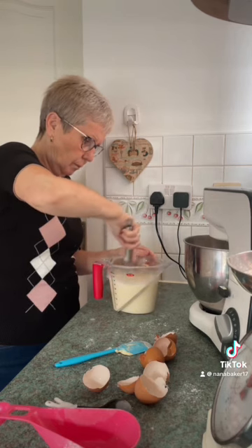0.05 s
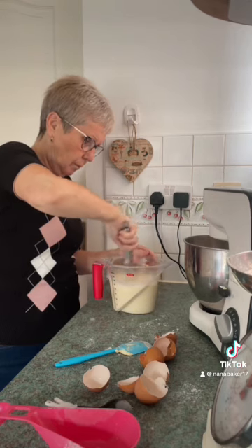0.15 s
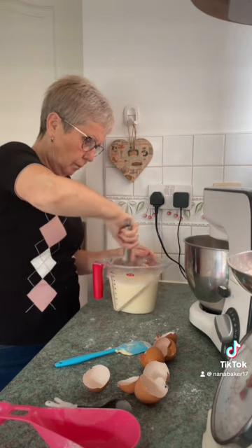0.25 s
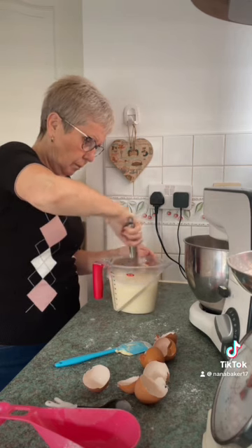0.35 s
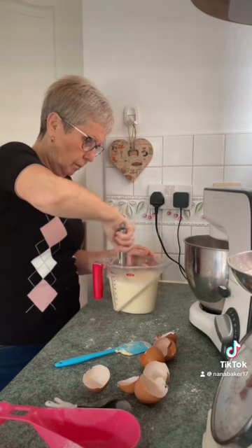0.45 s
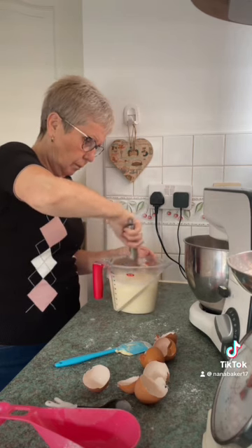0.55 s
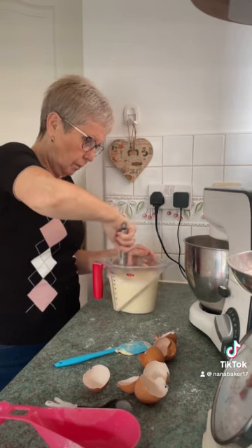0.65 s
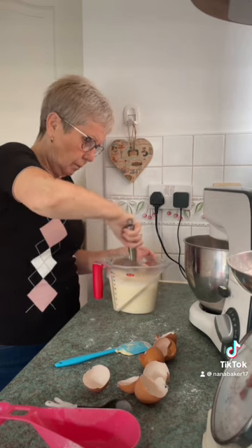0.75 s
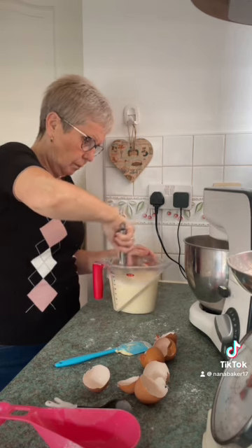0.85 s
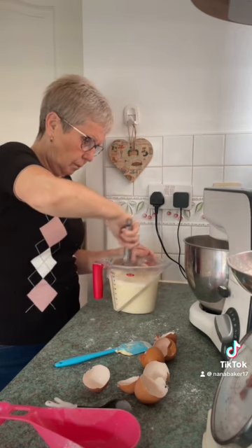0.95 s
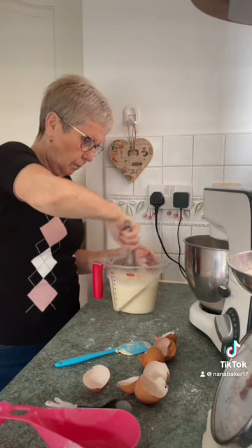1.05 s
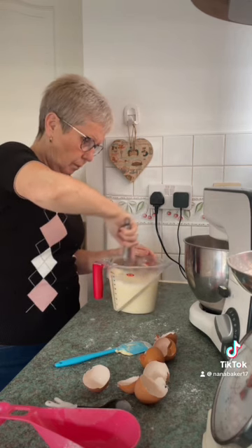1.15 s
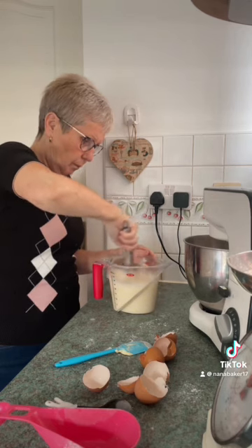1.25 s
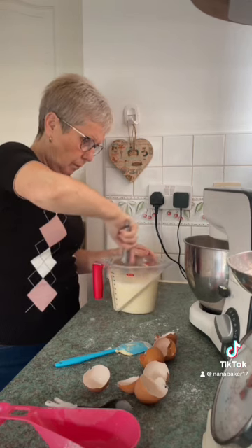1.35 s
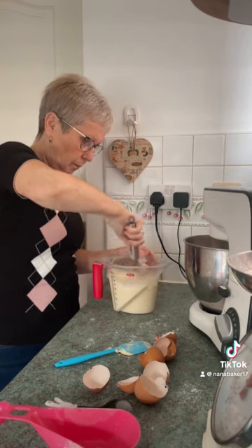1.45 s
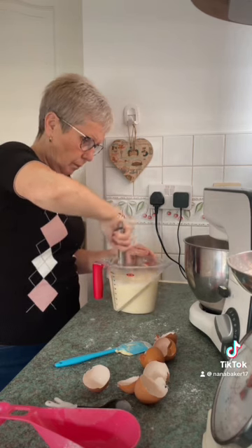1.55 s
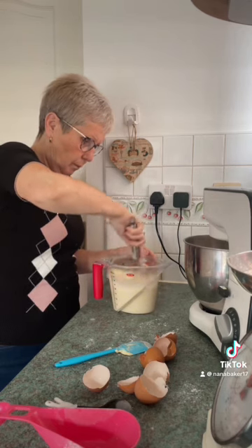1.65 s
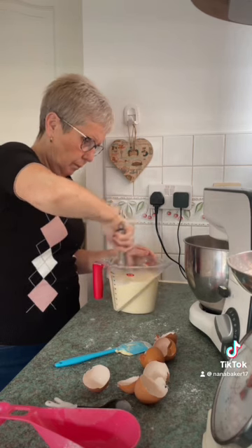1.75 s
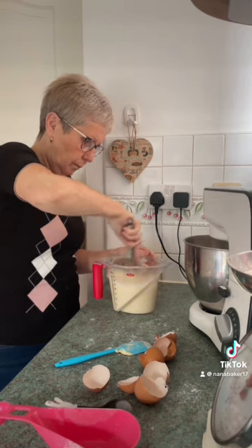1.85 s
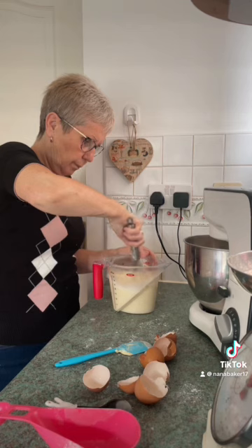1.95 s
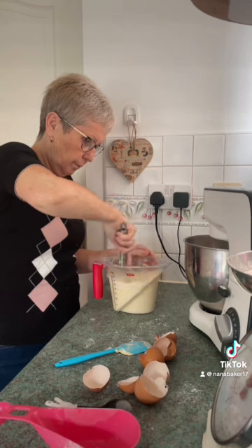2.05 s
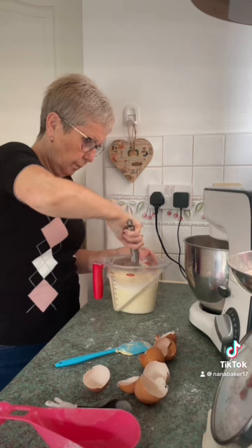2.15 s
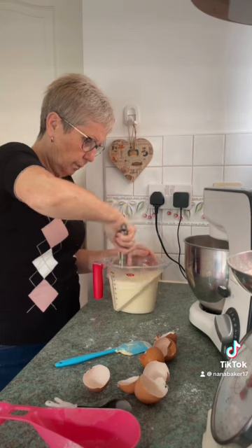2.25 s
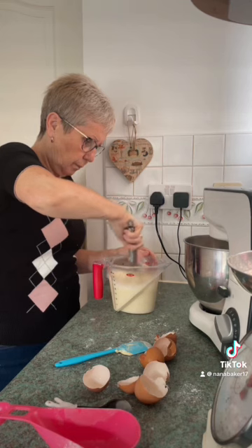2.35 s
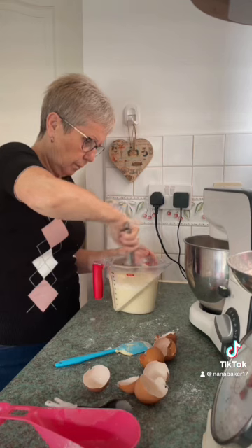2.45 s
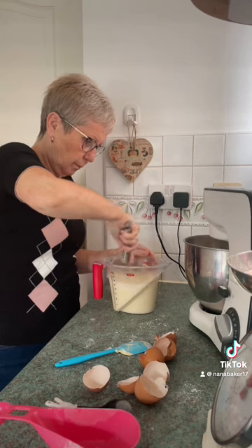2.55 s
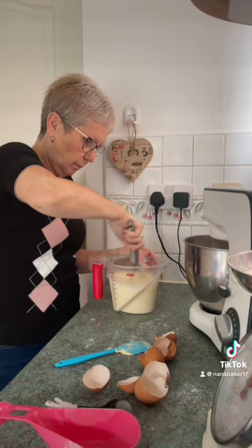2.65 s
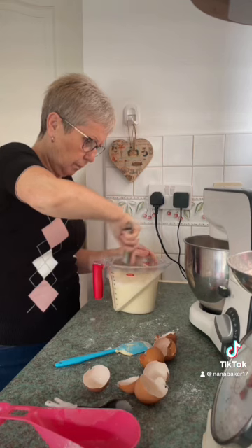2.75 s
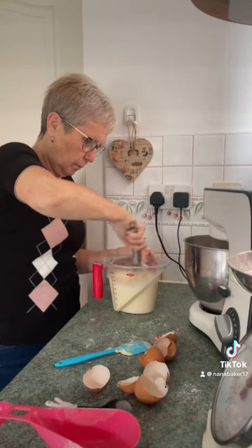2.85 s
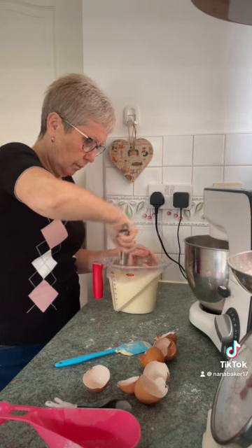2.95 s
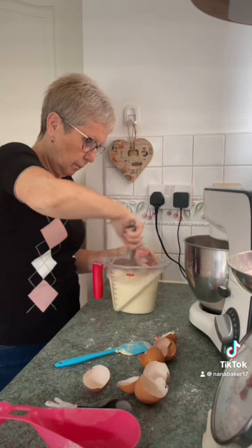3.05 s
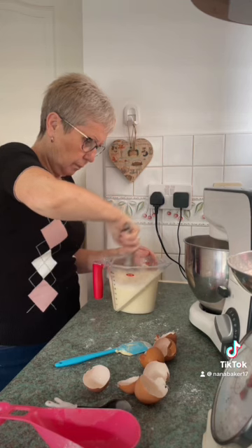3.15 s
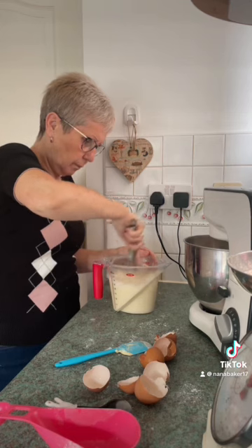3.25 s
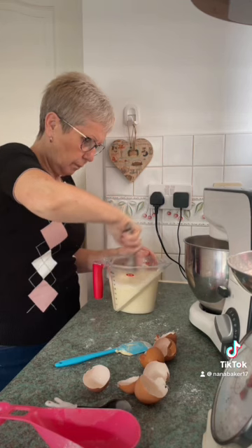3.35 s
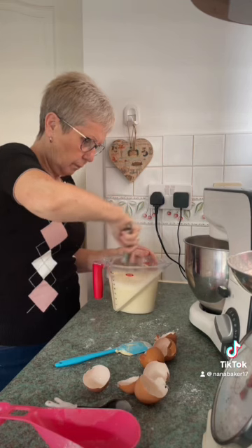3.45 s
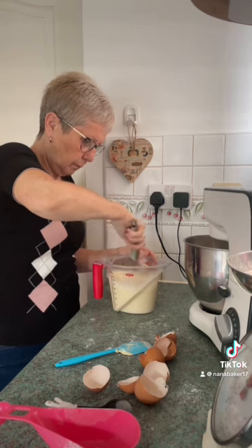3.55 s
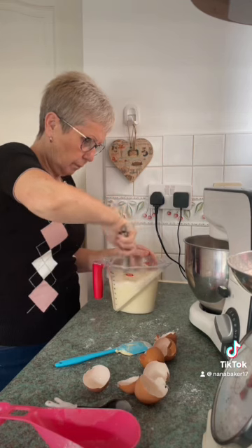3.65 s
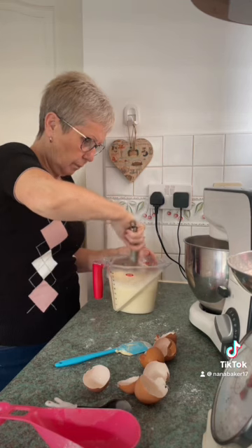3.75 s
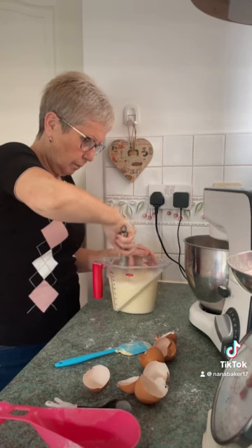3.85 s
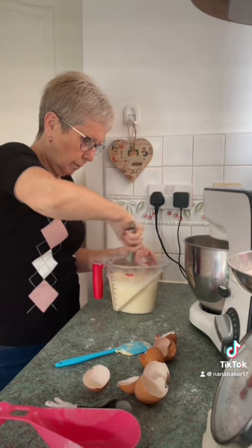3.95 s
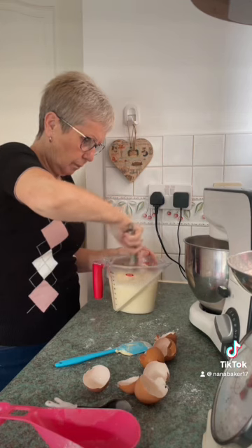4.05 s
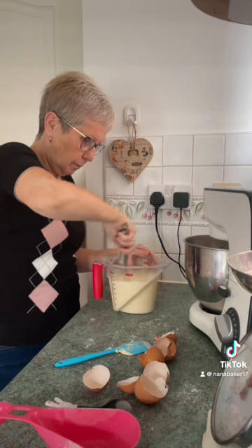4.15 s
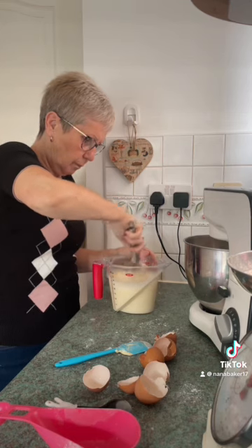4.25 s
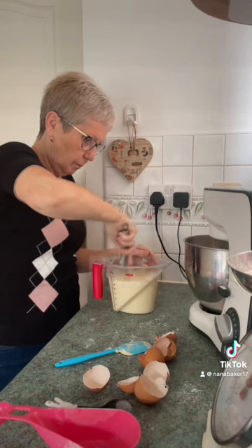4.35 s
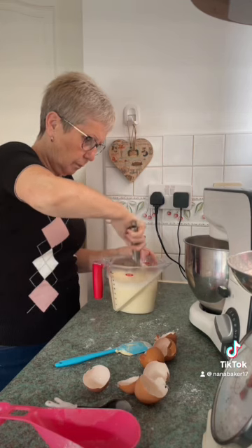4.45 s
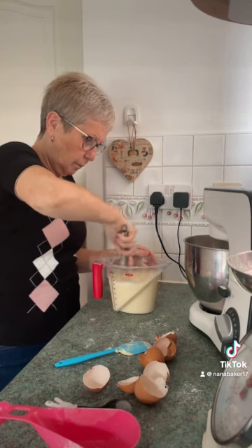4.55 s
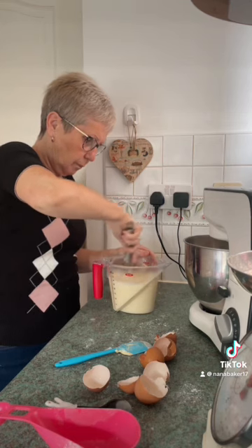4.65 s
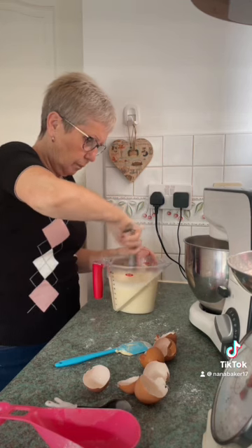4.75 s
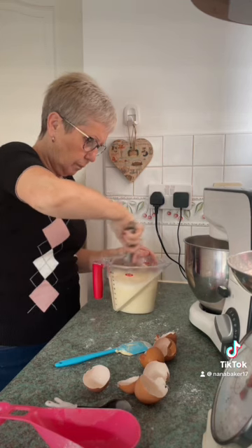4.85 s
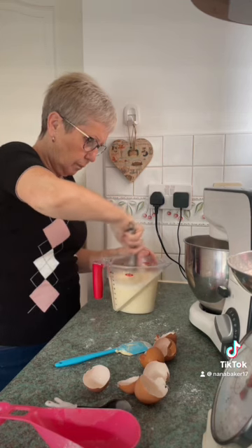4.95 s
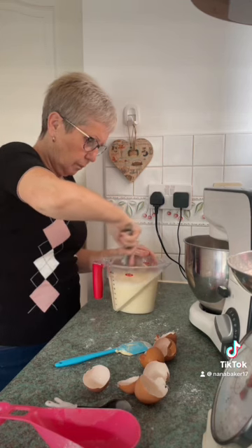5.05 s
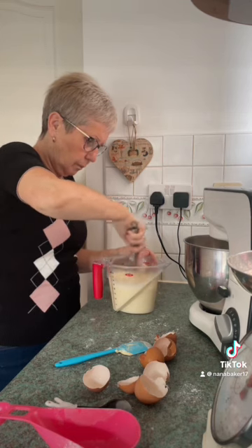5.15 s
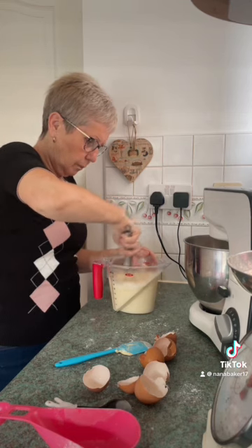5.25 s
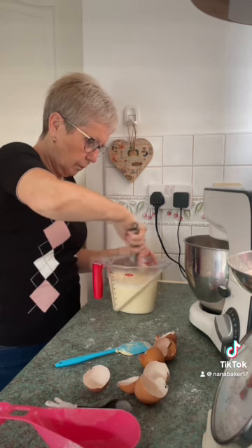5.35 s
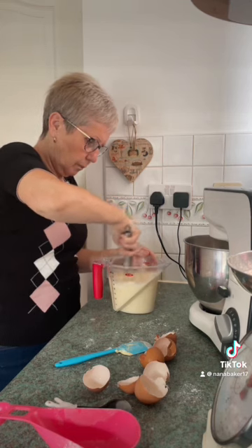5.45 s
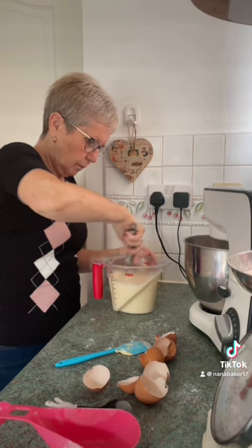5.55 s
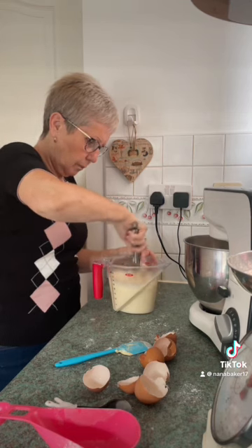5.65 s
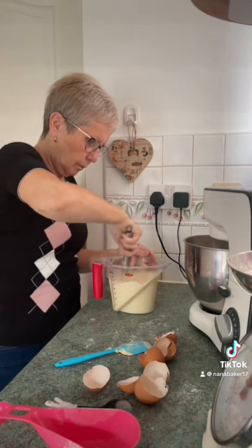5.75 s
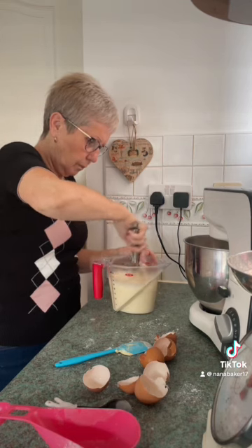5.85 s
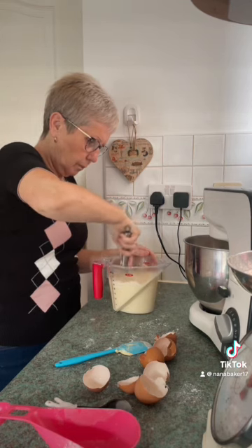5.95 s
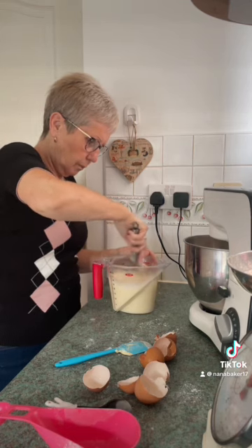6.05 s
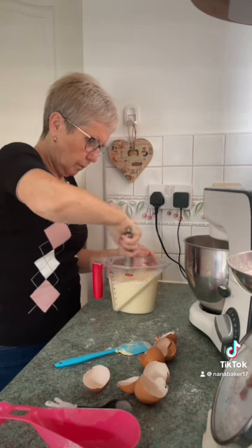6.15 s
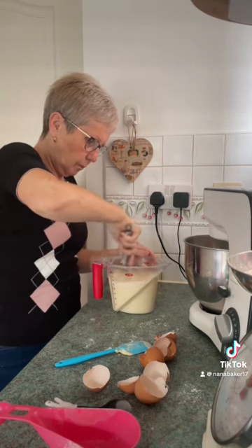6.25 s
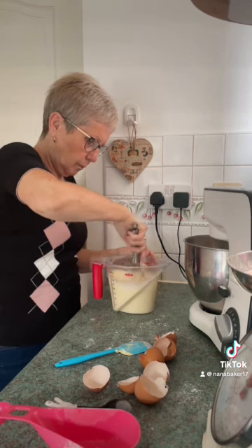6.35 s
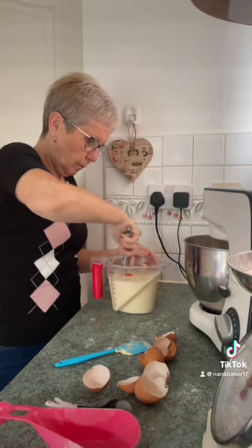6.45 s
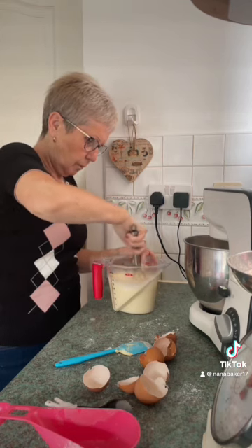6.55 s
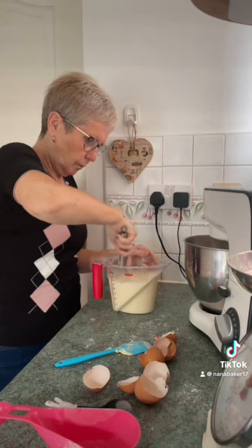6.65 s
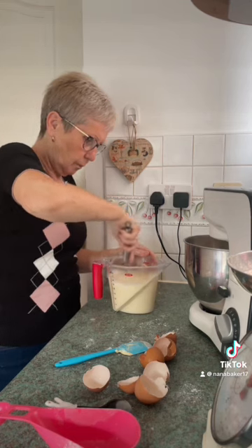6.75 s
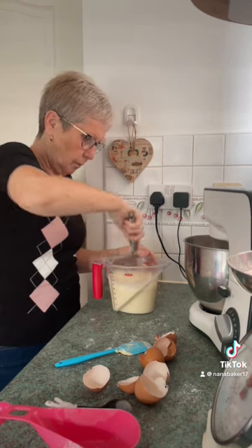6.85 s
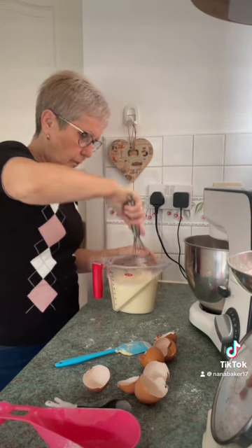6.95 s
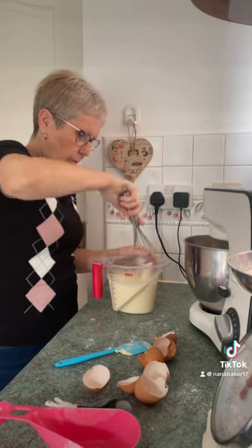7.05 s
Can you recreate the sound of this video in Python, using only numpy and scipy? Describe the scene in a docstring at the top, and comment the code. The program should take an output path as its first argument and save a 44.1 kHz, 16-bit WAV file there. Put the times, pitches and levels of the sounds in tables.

```python
"""Wires clatter and scrape in a jug: a whisk beats batter in a plastic jug on a counter, about four strokes a second.
In each stroke random wire clicks strike the wall, drag along it and slap the far side, ringing the jug's resonances.
Blows thump the counter, batter bubbles and gloops as ringing tones, and a few light touches are resonant noise.
A small tiled kitchen answers with noise echoes; low sines waver under a faint hiss, alone once the strokes stop."""
import sys
import numpy as np
from scipy import signal
from scipy.fft import rfft, irfft
from scipy.io import wavfile

SR = 44100
rng = np.random.default_rng(int(sys.argv[2]) if len(sys.argv) > 2 else 0)


def wav_record(signal):
    """Record a signal, one row per channel, as 16-bit PCM in the file named by sys.argv[1]."""
    frames = np.transpose(np.atleast_2d(signal))
    bounded = np.clip(frames, -1, 1)
    # unit amplitude maps onto the largest positive 16-bit level
    quanta = np.round(bounded * 32767).astype(np.int16)
    wavfile.write(sys.argv[1], SR, quanta)


N = 313110

# Wires meet the wall and then drag along it. Each row: start in seconds, strike level in dB, thump level in dB,
# drag level in dB, time from the start to the drag's peak in seconds.
STROKES = [(0.1486, -24, -32.5, -29, 0.048), (0.378, -23, -34.5, -28, 0.047),
           (0.6024, -22, -35.5, -32, 0.045), (0.8113, -22, -35, -35.5, 0.049),
           (1.0294, -20, -30.5, -33, 0.058), (1.2299, -22, -36.5, -34, 0.066),
           (1.418, -19, -34.5, -33, 0.059), (1.6714, -17, -34, -32.5, 0.077),
           (1.9335, -26, -36, -30, 0.074), (2.1693, -22.5, -32.5, -29, 0.069),
           (2.394, -22.5, -33.5, -28.5, 0.067), (2.6327, -22.5, -33, -28, 0.058),
           (2.8669, -23, -37.5, -29, 0.038), (3.1069, -23, -31.5, -23, 0.052),
           (3.3232, -26.5, -34.5, -27.5, 0.062), (3.566, -21, -31, -30, 0.048),
           (3.8055, -19, -31, -30, 0.06), (4.0317, -20.5, -32.5, -36, 0.072),
           (4.2673, -22, -36, -28.5, 0.058), (4.4971, -22, -32.5, -26, 0.061),
           (4.7117, -22, -32.5, -27.5, 0.058), (4.9449, -22.5, -30.5, -27.5, 0.056),
           (5.1847, -25.5, -35.5, -29, 0.038), (5.4122, -25, -33, -29, 0.051),
           (5.658, -20.5, -34, -36, 0.057), (5.8891, -20, -35, -29.5, 0.059),
           (6.1179, -20, -33.5, -33, 0.066), (6.3585, -21, -33.5, -31.5, 0.051),
           (6.5893, -21, -35.5, -32, 0.061)]
# Wires slap the far side. Each row: start in seconds, level in dB, decay time in seconds.
FAR_SLAPS = [(0.0, -29.5, 0.011), (0.2113, -27.5, 0.0053), (0.418, -29.5, 0.011), (0.622, -30.5, 0.0079),
             (1.083, -33, 0.004), (1.097, -23.5, 0.0085), (1.289, -32.5, 0.015), (1.308, -33, 0.0056),
             (1.502, -21.5, 0.021), (1.737, -31, 0.025), (1.771, -23, 0.0074), (1.968, -27.5, 0.041),
             (2.235, -30, 0.012), (2.46, -24, 0.007), (2.685, -33.5, 0.011), (2.9438, -25.5, 0.0086),
             (2.951, -21.5, 0.015), (3.165, -32.5, 0.016), (3.4079, -21, 0.018), (3.645, -24, 0.0053),
             (3.651, -21, 0.014), (3.87, -21, 0.006), (4.093, -24.5, 0.0047), (4.0969, -18.5, 0.013),
             (4.312, -36, 0.0094), (4.328, -25, 0.014), (4.5683, -24, 0.006), (4.7787, -28, 0.015),
             (5.013, -22, 0.016), (5.245, -20.5, 0.017), (5.48, -25, 0.022), (5.722, -23.5, 0.02),
             (5.9308, -25.5, 0.0027), (6.18, -22.5, 0.015), (6.4075, -25.5, 0.014), (6.642, -24.5, 0.018)]

# Where the body, middle, treble and top rows of force meet
BODY_TOP_HZ, TREBLE_FROM_HZ, TOP_FROM_HZ = 1184, 3600, 9700


def from_db(db):
    """Turns a level in dB into a gain."""
    return 10 ** (np.asarray(db) / 20)


def rms_one(x):
    """Scales a sound to an average (rms) strength of 1."""
    return x / np.sqrt(np.mean(x ** 2) + 1e-20)


def at_hz(points, hz):
    """Reads a table between its points, along a logarithmic frequency axis."""
    points = np.array(points)
    return np.interp(np.log(hz + 1), np.log(points[:, 0]), points[:, 1])


def coloured(x, gain):
    """Gives every frequency of a sound its own gain."""
    return irfft(rfft(x) * gain(np.fft.rfftfreq(len(x), 1 / SR)), len(x))


def drift(rate):
    """Slow random wander of spread 1: noise smoothed by a low-pass filter at rate, in Hz."""
    r = np.exp(-2 * np.pi * rate / SR)
    smooth = signal.lfilter([1], [1, -2 * r, r * r], rng.standard_normal(N + SR))
    return rms_one(smooth[SR:])   # the first second lets the filter settle


def resonances(x, modes):
    """Rings x through side-by-side resonances (Hz, width in Hz, dB), every second one upside down."""
    out = np.zeros(N)
    for k, (hz, width, level_db) in enumerate(modes):
        r = np.exp(-np.pi * width / SR)
        poles = [1, -2 * r * np.cos(2 * np.pi * hz / SR), r * r]
        out += (-1) ** k * from_db(level_db) * signal.lfilter([1 - r, 0, r - 1], poles, x)
    return out


def patchy(x, depth_db, rate):
    """Splits x into overlapping half-octave bands, each flickering in level on its own."""
    out = np.zeros(N)
    for centre in 250 * 2 ** np.arange(0, 6.5, .5):
        band = coloured(x, lambda hz: np.clip(1 - 2 * np.abs(np.log2((hz + 1) / centre)), 0, 1))
        out += band * from_db(depth_db * drift(rate))
    return out


def add(track, s, shape, levels_db):
    """Adds one rise and fall, starting at s seconds, to the rows of force."""
    i = int(max(s, 0) * SR)
    track[:, i:i + shape.shape[1]] += from_db(levels_db)[:, None] * shape[:, :N - i]


def contact_force():
    """Wires press the wall in four pitch rows: knock and rattle at a strike, a swelling drag, a slap."""
    # Each list: change in dB for the body, middle, treble and top rows.
    strike_rows_db = np.array([-12.5, 1.46, -7.5, -2.5])
    drag_rows_db = np.array([-17, 0.55, -7.5, -6.5])
    slap_rows_db = np.array([-15, 0.6, -6.5, -1.5])
    # Extra rise time in seconds for the same four rows: lower rows rise more slowly.
    extra_rise_s = np.array([0.019, 0.0039, 0.00071, 0.00025])
    strike_onset_s, knock_decay_s, strike_decay_s = 0.00086, 0.01, 0.02
    swell_share = 0.12   # a slap's rise time as a share of its decay
    # Before a slap the wires leave the wall, the more so the harder the slap
    lift_s, lift_db_per_db, gentle_slap_db = 0.027, 0.6, -26.5

    knocks, strikes, slaps, drags = np.full((4, 4, N), 1e-9)
    t = np.arange(SR // 5) / SR
    rise = 1 - np.exp(-t / (strike_onset_s + extra_rise_s[:, None]))
    for s, peak_db, thump_db, drag_db, time_to_peak in STROKES:
        add(knocks, s, rise * np.exp(-t / knock_decay_s), peak_db + strike_rows_db)
        add(strikes, s, rise * np.exp(-t / strike_decay_s), peak_db + strike_rows_db)
        swell = np.sin(np.pi * np.clip(t[None] / (2 * time_to_peak), 0, 1)) ** 2
        add(drags, s, swell, drag_db + drag_rows_db)

    lift_db = np.zeros(N)
    for s, peak_db, decay in FAR_SLAPS:
        shape = (1 - np.exp(-t / (swell_share * decay))) * np.exp(-t / decay)
        add(slaps, s, shape[None] / shape.max(), peak_db + slap_rows_db)
        before = np.clip((s - np.arange(N) / SR) / lift_s, 0, 1)
        hardness_db = max(peak_db - gentle_slap_db, 0)
        lift_db += lift_db_per_db * hardness_db * np.sin(np.pi * np.sqrt(before))
    return knocks, strikes, slaps, drags * from_db(2.94 * drift(45) - lift_db)


def wire_clicks():
    """Many tiny wire contacts: clicks at random times, of random size and direction."""
    clicks_per_s, spread_db = 16000, 2.0
    sizes = from_db(spread_db * np.minimum(rng.exponential(1, N), 5)) * rng.choice([-1, 1], N)
    return rms_one(sizes * (rng.random(N) < clicks_per_s / SR))


def wire_rattle(clicks, strikes, scrapes):
    """The clicks heard as a plain rattle, cut into four bands that each follow their row of force."""
    # Tone of the rattle. Each row: frequency in Hz, relative level in dB.
    rattle_tone = [(140, -24), (230, -2.5), (415, 4.5), (496, 1.5), (572, 8), (1050, 3.5), (1150, -3),
                   (1590, -8), (3670, -10.5), (5540, -11), (8670, -7.5), (11100, -14), (14300, -10),
                   (15600, -12.5), (16500, -27)]
    rattle = coloured(clicks, lambda hz: from_db(at_hz(rattle_tone, hz)))
    rattle = rms_one(patchy(rattle, depth_db=2.0, rate=17.6))
    under = []
    for edge in (BODY_TOP_HZ, TREBLE_FROM_HZ, TOP_FROM_HZ):
        under.append(coloured(rattle, lambda hz: 1 / (1 + (hz / edge) ** 6)))
    bands = np.diff([0 * rattle, *under, rattle], axis=0) * from_db([[5.0], [3.0], [7.0], [7.0]])
    # a strike is mostly ring, with little rattle below the treble
    strike_share = from_db([[-10.0], [-9.0], [-1.5], [-1.5]])
    return np.sum(bands * (scrapes + strike_share * strikes), axis=0)


def jug_ring(clicks, knocks, scrapes):
    """The clicks ring the jug's resonances, in a different balance for knocks and for scrapes."""
    # Resonances of the jug. Each row: frequency in Hz, width in Hz unless the damping below is wider,
    # relative level in dB for knocks, relative level in dB for drags and slaps.
    jug_modes = [(417, 25, 10.5, 4), (616, 16, 18, -33), (550, 12, 0, 15), (1030, 13, 21, -51),
                 (1180, 126, 11.5, 19.5), (1170, 30, -17, 13), (1348, 40, -10.5, -12.5),
                 (1757, 23, 0, -21.5), (1852, 130, -9, -1.5), (2172, 13, -3, 6.5), (2310, 17, -23, -0.5),
                 (2610, 63, -13, 8), (3168, 110, -8.5, 0), (3593, 200, -2.5, 5), (4480, 300, -16.5, -6),
                 (5850, 58, -2, -7), (6980, 640, -15, -1.5), (8050, 33, 4.5, 10), (8600, 15, -19, -48)]
    out = np.zeros(N)
    for k, (hz, width, knock_db, scrape_db) in enumerate(jug_modes):
        row = int(hz > BODY_TOP_HZ) + int(hz > TREBLE_FROM_HZ)
        force = from_db(knock_db + 14.5) * knocks[row] + from_db(scrape_db) * scrapes[row]
        # the point of contact wanders, so each mode comes and goes
        uneven = from_db(2.5 * np.clip(drift(25), -3, 1.3))
        damped_width = max(width, 60 + hz / 18)
        out += (-1) ** k * resonances(force * uneven * clicks, [(hz, damped_width, 0)])
    return out


def slosh(force):
    """Batter churned by the wires: random bubbles ring a few cycles each, over about three octaves."""
    bubbles_per_s, pitch_count = 370, 24
    sizes = from_db(3.0 * np.minimum(rng.exponential(1, N), 3.0))
    born = (rng.random(N) < bubbles_per_s / SR) * sizes
    dealt = rng.integers(0, pitch_count, N)   # which pitch each bubble gets
    out = np.zeros(N)
    for k, hz in enumerate(np.geomspace(450, 4200, pitch_count)):
        out += resonances(force * born * (dealt == k) + 1e-12, [(hz, hz / 9, 0)])
    return from_db(18.0) * out


def thumps():
    """Each blow soon pushes the jug against the counter: a soft push into low, unevenly shared modes."""
    # Resonances of the jug on the counter. Each row: frequency in Hz, width in Hz, relative level in dB.
    counter_modes = [(69, 3.9, -5.5), (114.8, 5.1, 1), (168, 9.2, -0.5), (206, 9.3, -6.5), (317, 26, -9.5)]
    lag_s, slap_thump_db = 0.0117, -17.5   # delay after the blow; thump level relative to its slap
    blows = [(row[0], row[2]) for row in STROKES]
    blows += [(row[0], row[1] + slap_thump_db) for row in FAR_SLAPS]
    starts, levels_db = np.array(blows).T
    pushes = np.zeros(N)
    pushes[((np.maximum(starts, 0) + lag_s) * SR).astype(int)] = from_db(levels_db)
    soft = np.convolve(pushes, np.hanning(SR // 250))[:N] + 1e-12   # each push lasts 4 ms
    return from_db(21.5) * sum(resonances(soft * from_db(2.0 * drift(2.5)), [mode]) for mode in counter_modes)


def whisk():
    """Wires on the wall give rattle and ring together; the same motion churns batter and thumps the counter."""
    knocks, strikes, slaps, drags = contact_force()
    clicks = wire_clicks()
    scrapes = slaps + drags
    out = wire_rattle(clicks, strikes, scrapes) + jug_ring(clicks, knocks, scrapes)
    return out + slosh(drags[1] + .4 * slaps[1]) + thumps()


def kitchen(x, wet_db, count=9):
    """Adds dense reflections that die at their own rate per octave; their pattern changes at a steady pace."""
    # How long echoes last. Each row: frequency in Hz, time to fall by 60 dB in seconds.
    echo_times = [(100, 0.3), (260, 0.3), (700, 0.28), (1840, 0.26), (4850, 0.26), (12800, 0.23)]
    t = np.arange(SR // 2) / SR
    edges = 40 * 2. ** np.arange(10)
    edges[-1] = .45 * SR
    echo = np.zeros((count, len(t)))
    for low, high in zip(edges, edges[1:]):
        octave = signal.butter(2, [low, high], "band", fs=SR, output="sos")
        band = signal.sosfilt(octave, rng.standard_normal(echo.shape))
        echo += band * from_db(-60 * t / at_hz(echo_times, np.sqrt(low * high)))
    echo *= 1 - np.exp(-t / 0.0012)
    echo /= np.sqrt(np.sum(echo ** 2, axis=1, keepdims=True))
    # blend round the circle of echo patterns, 23 steps a second
    place = np.arange(N) / SR * 23 % count
    apart = np.abs((place - np.arange(count)[:, None] + count / 2) % count - count / 2)
    shares = np.cos(np.pi / 2 * np.clip(apart, 0, 1))
    wet = signal.fftconvolve(x * shares, echo, axes=1)[:, :N].sum(axis=0)
    return x + from_db(wet_db) * wet


def background():
    """A few low sine tones waver a little in level, over steady coloured noise."""
    # Tones of the hum. Each row: frequency in Hz, level in dB around which it wavers.
    hum_tones = [(100, -57.5), (114, -62.5), (300, -79)]
    # Tone of the hiss. Each row: frequency in Hz, relative level in dB.
    hiss_tone = [(18, -43), (30, -19), (55, -11), (80, -21), (140, -11), (200, -23.5), (300, -21.5),
                 (350, -37), (1000, -39.5), (4770, -45.5), (11100, -42), (14500, -41), (16500, -57)]
    hiss_db = -61.5
    t = np.arange(N) / SR
    hum = np.zeros(N)
    for hz, db in hum_tones:
        waver = from_db(db + 1.5 * drift(3.4))
        hum += np.sqrt(2) * waver * np.sin(2 * np.pi * (hz * t + rng.random()))
    hiss = coloured(rng.standard_normal(N), lambda hz: from_db(at_hz(hiss_tone, hz)))
    return hum + from_db(hiss_db) * rms_one(hiss)


def gloops():
    """Air pockets close in the batter: each rings as a decaying sine whose pitch creeps up."""
    # Each row: start in seconds, level in dB, starting pitch in Hz, time to fall by 60 dB in seconds.
    air_pockets = [(0.42, -22, 1125, 0.067), (1.509, -24.5, 636, 0.1), (1.987, -19, 1180, 0.032),
                   (2.244, -28.5, 1476, 0.073), (2.45, -12, 1186, 0.026), (2.946, -30, 1410, 0.093),
                   (2.964, -35, 921, 0.056), (3.644, -21, 634, 0.095), (3.846, -19.5, 908, 0.1),
                   (3.869, -23, 856, 0.077), (4.101, -19, 1134, 0.06), (4.334, -29, 608, 0.14),
                   (4.789, -32.5, 582, 0.22), (5.248, -31, 1450, 0.085), (6.65, -23, 579, 0.09)]
    out, t = np.zeros(N), np.arange(SR // 5) / SR
    for s, peak_db, hz, t60 in air_pockets:
        i = int(s * SR)
        shape = (1 - np.exp(-t / 0.0026)) * from_db(peak_db - 60 * t / t60)
        out[i:i + len(t)] += shape * np.sin(2 * np.pi * hz * t * (1 + 0.29 * t))
    return out


def light_touches():
    """Faint light touches: brief swells of noise passed twice through a broad resonance."""
    # Each row: start in seconds, relative level in dB, centre frequency in Hz.
    touches = [(2.14, -31, 1900), (3.7694, -28.5, 2460), (5.39, -25, 2040), (6.094, -32, 3420)]
    touch_s, width_hz = 0.035, 450
    out, t = np.zeros(N), np.arange(N) / SR
    for s, level_db, hz in touches:
        swell = np.sin(np.pi * np.clip((t - s) / touch_s, 0, 1)) * rng.standard_normal(N)
        once = resonances(swell + 1e-9, [(hz, width_hz, level_db)])
        out += resonances(once, [(hz, width_hz, 0)])
    return out


def scene():
    """The whisk and batter sound in the kitchen, with the background around them."""
    sources = whisk() + gloops() + light_touches()
    return (from_db(-5.5) * kitchen(sources, wet_db=-1.0) + background())[None]


def record(dry):
    """The microphone drops the deepest bass and colours the treble; the very top is cut."""
    # A dip and a peak. Each row: frequency in Hz, width in Hz, level in dB, sign (-1 takes away, 1 adds).
    microphone_colour = [(11200, 1100, -11.5, -1), (14550, 1100, -6, 1)]
    low_hz, cutoff_hz = 45, 16200
    thin = signal.sosfilt(signal.butter(3, low_hz, "high", fs=SR, output="sos"), dry)
    colour = sum(np.sign(sign) * resonances(thin[0], [(hz, width, db)])
                 for hz, width, db, sign in microphone_colour)
    return signal.sosfilt(signal.cheby2(14, 60, cutoff_hz, fs=SR, output="sos"), thin + colour)


dry = scene()
out = record(dry)
wav_record(out)
```